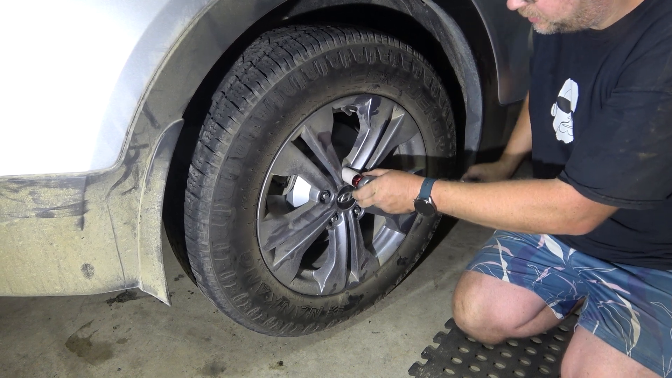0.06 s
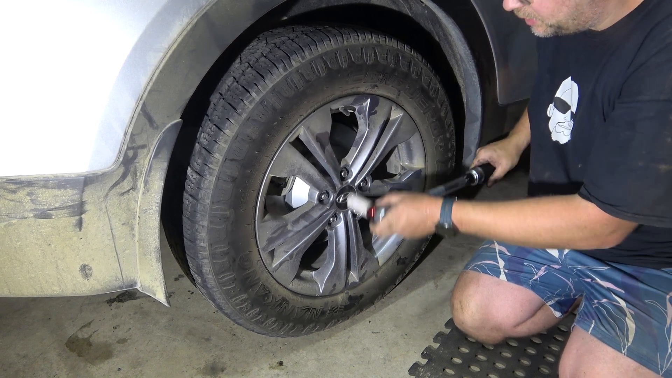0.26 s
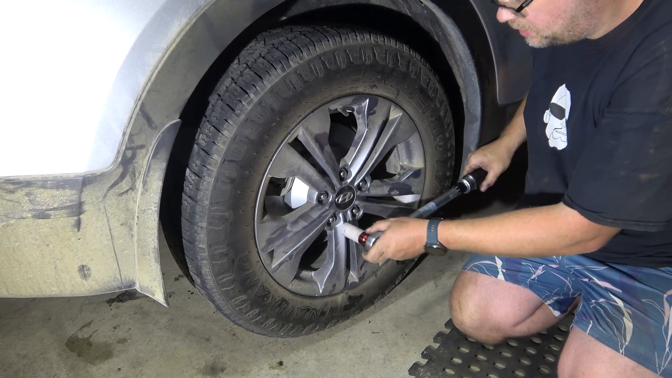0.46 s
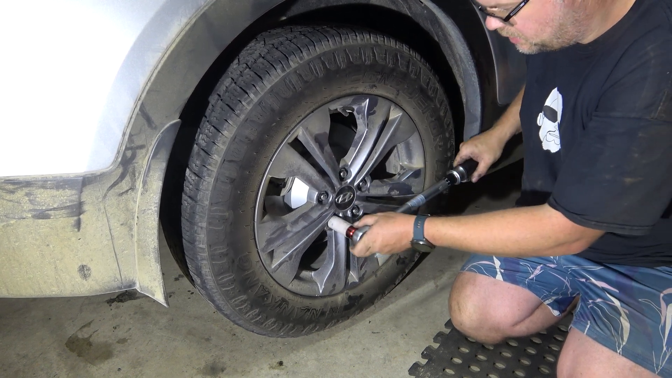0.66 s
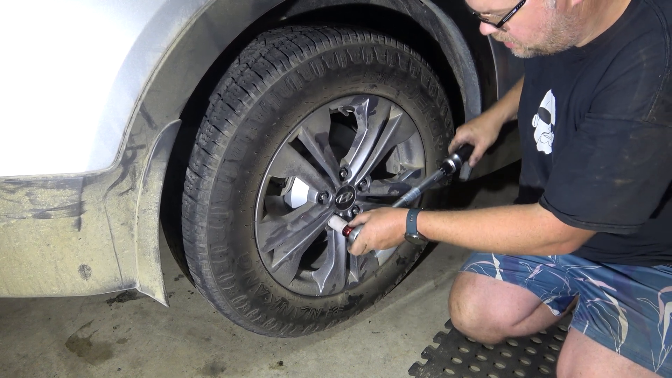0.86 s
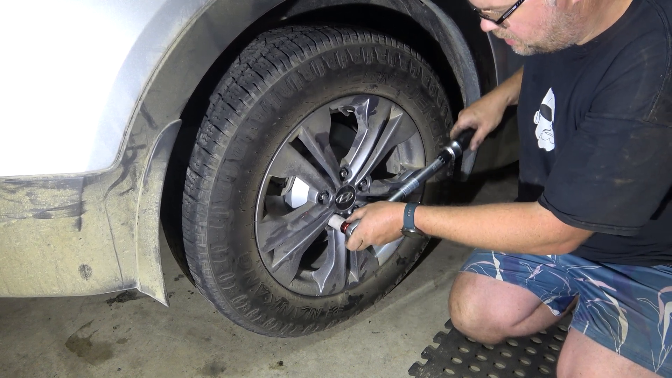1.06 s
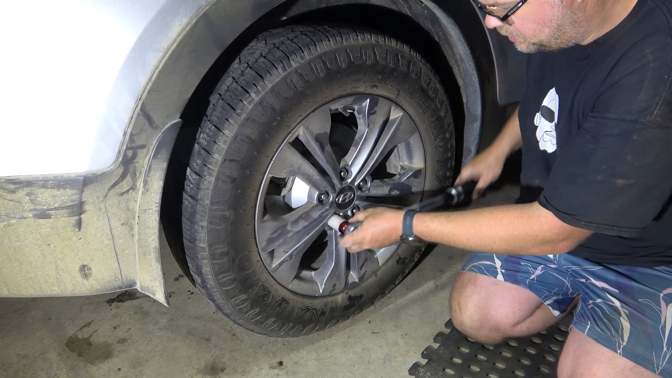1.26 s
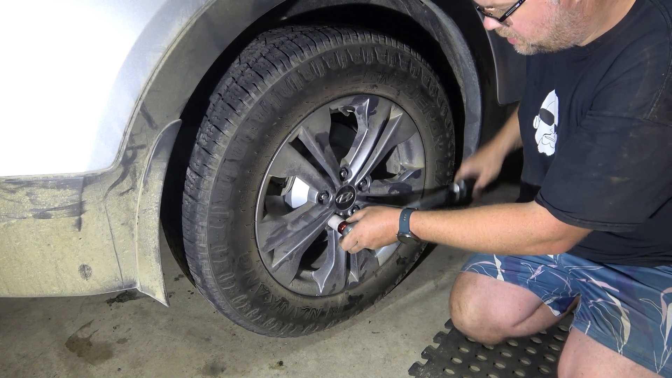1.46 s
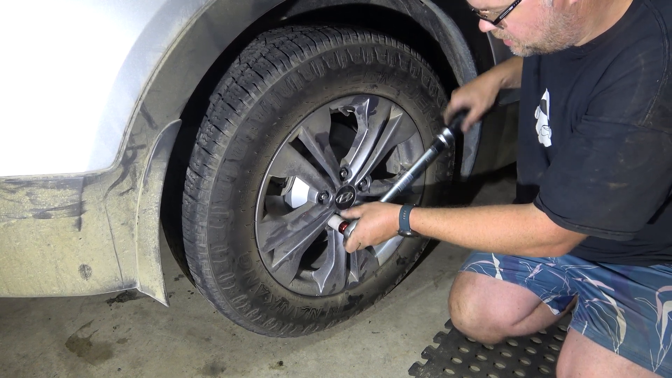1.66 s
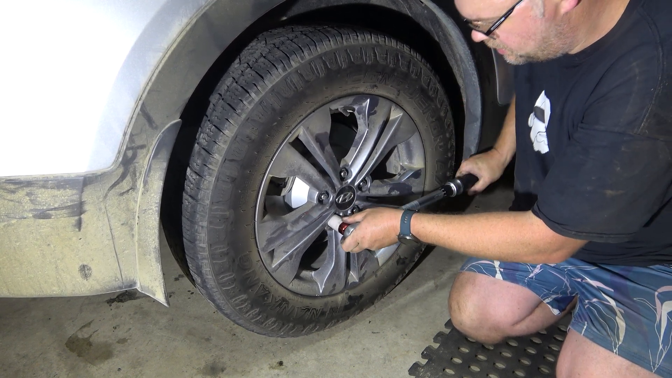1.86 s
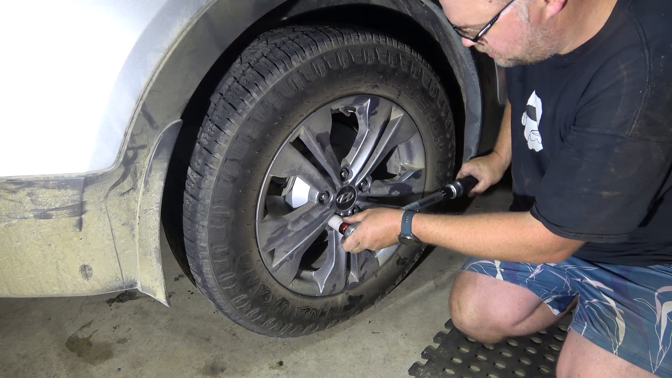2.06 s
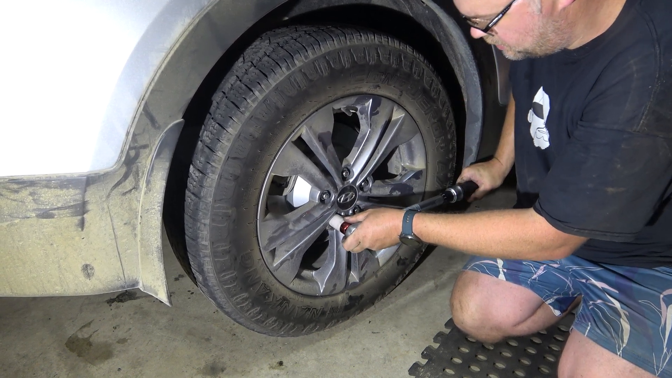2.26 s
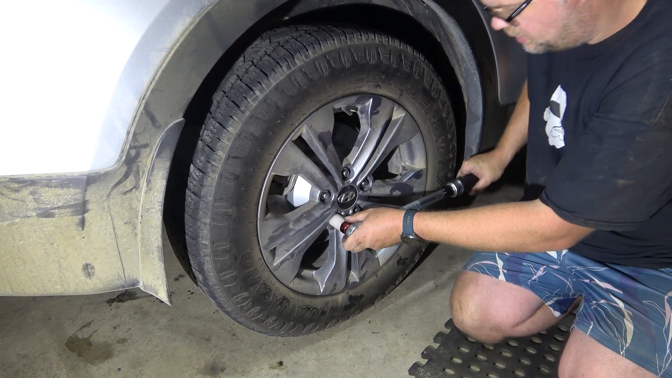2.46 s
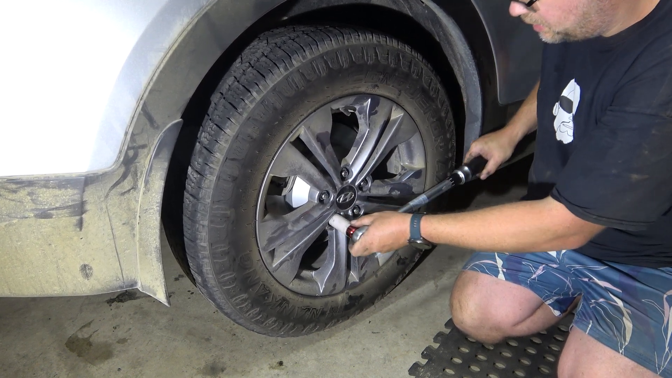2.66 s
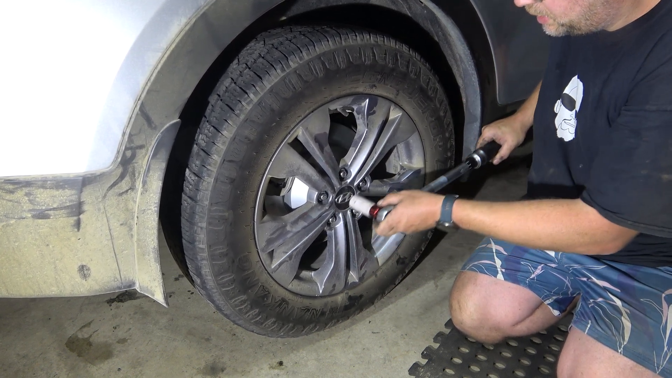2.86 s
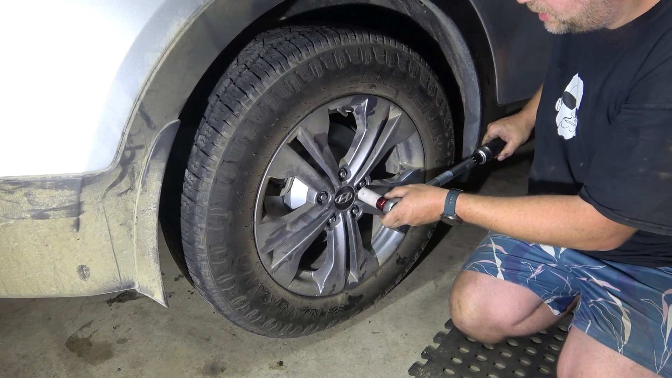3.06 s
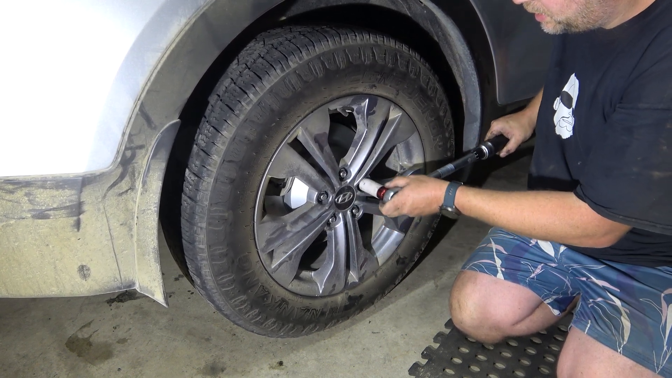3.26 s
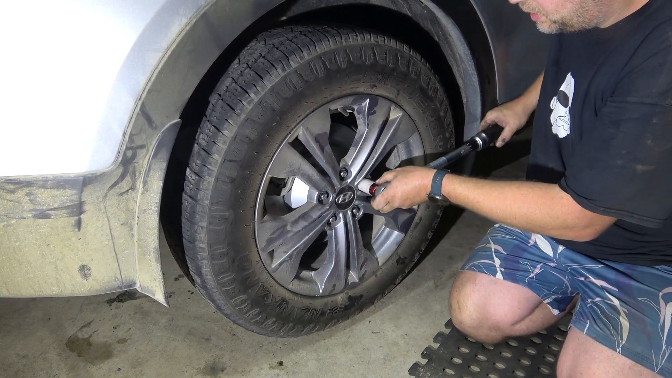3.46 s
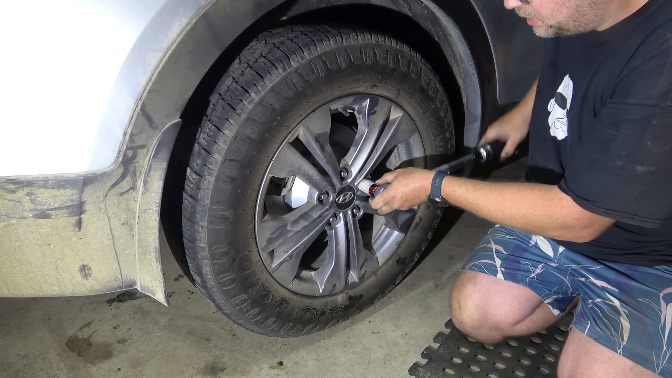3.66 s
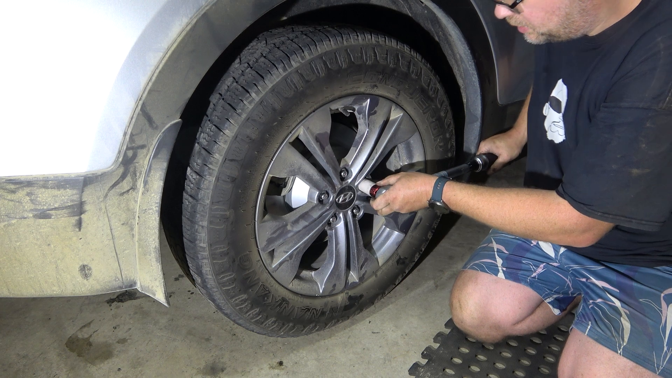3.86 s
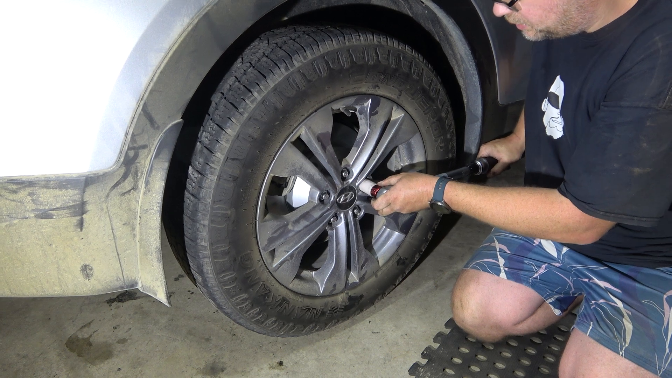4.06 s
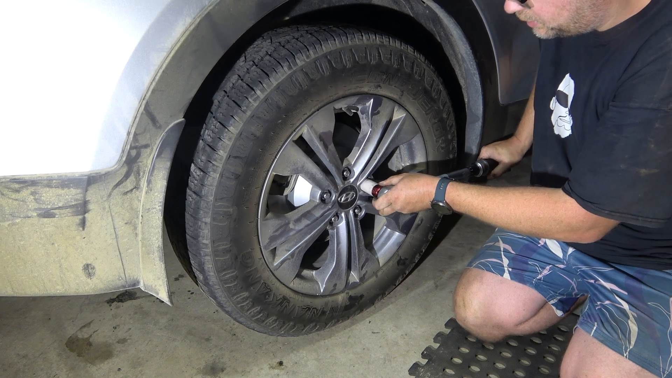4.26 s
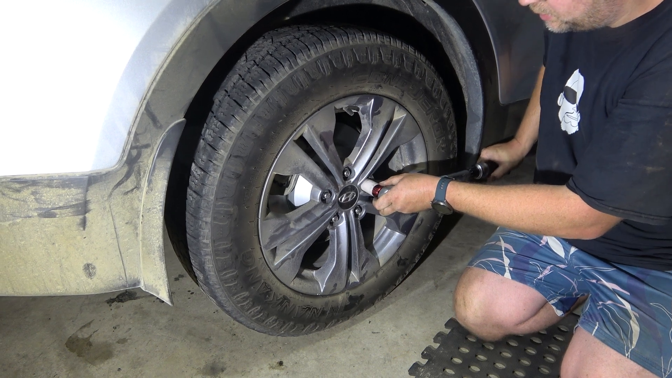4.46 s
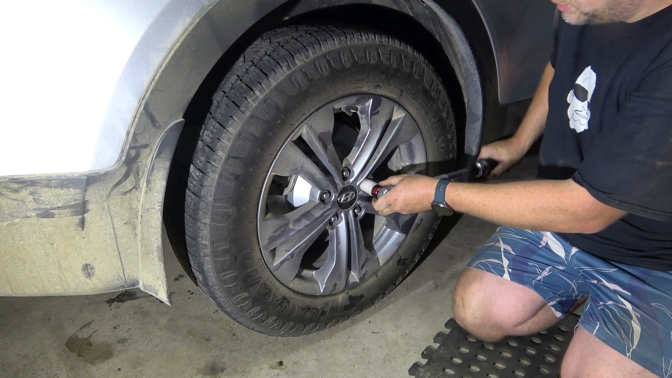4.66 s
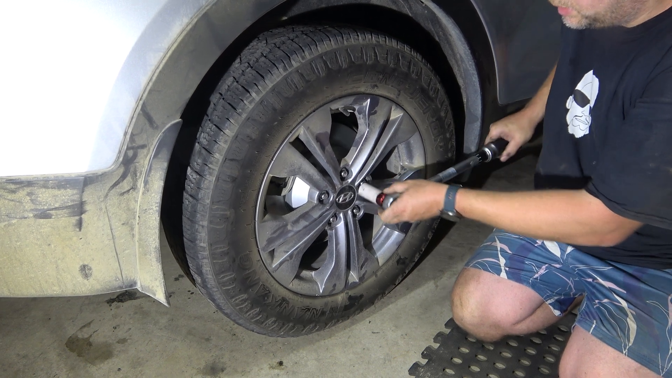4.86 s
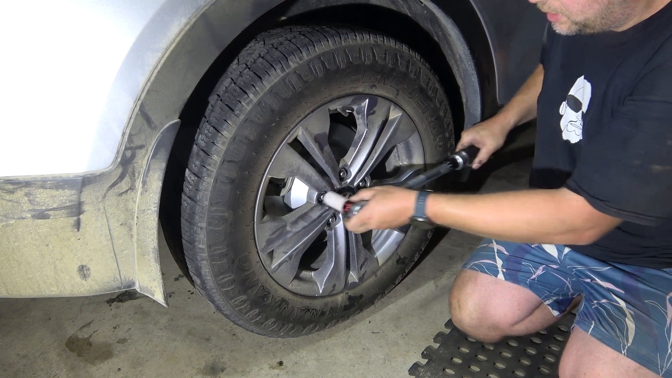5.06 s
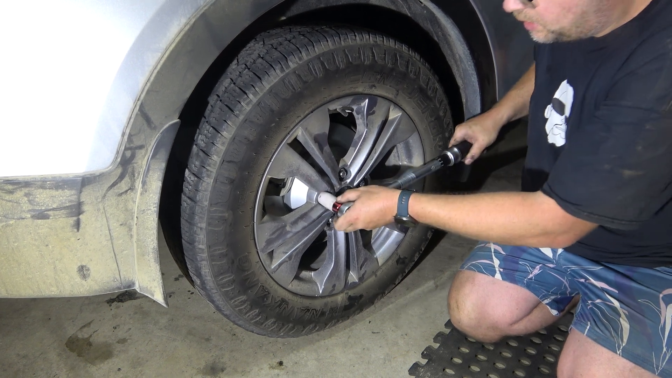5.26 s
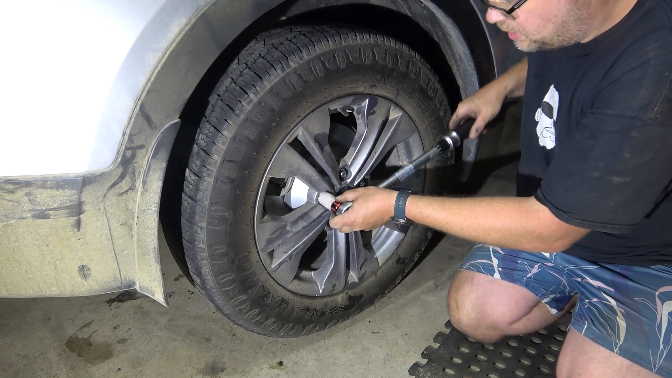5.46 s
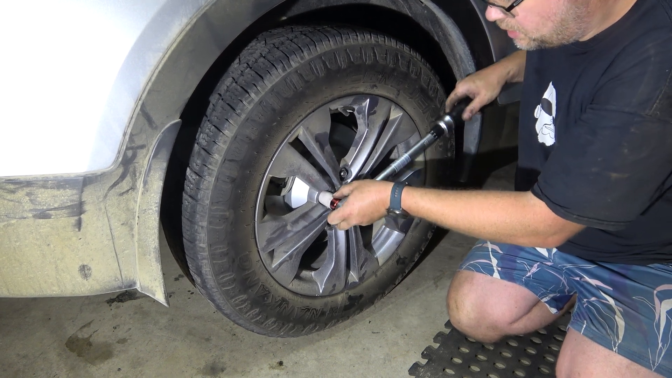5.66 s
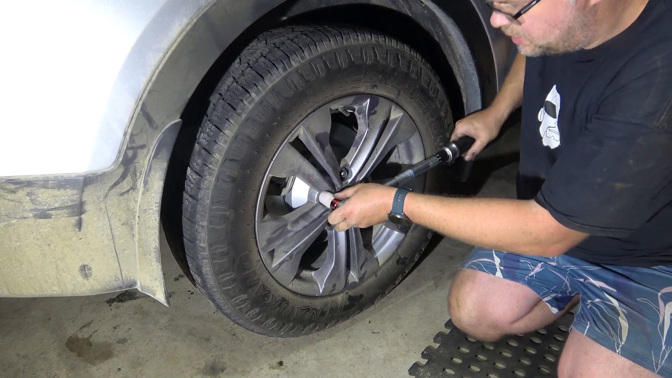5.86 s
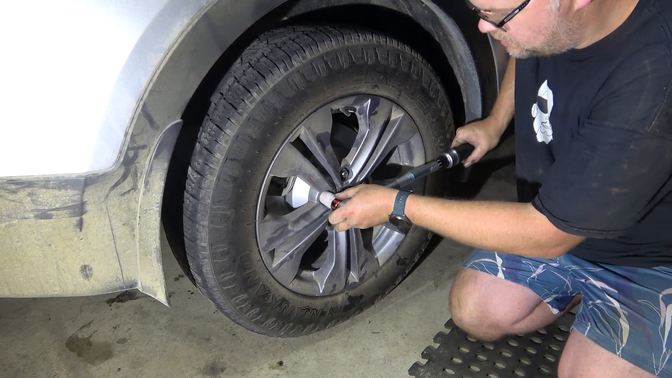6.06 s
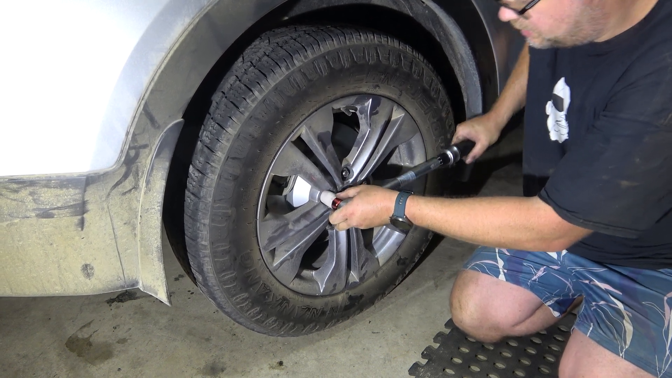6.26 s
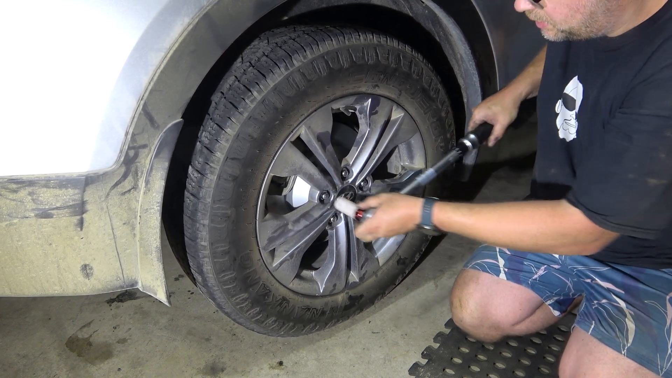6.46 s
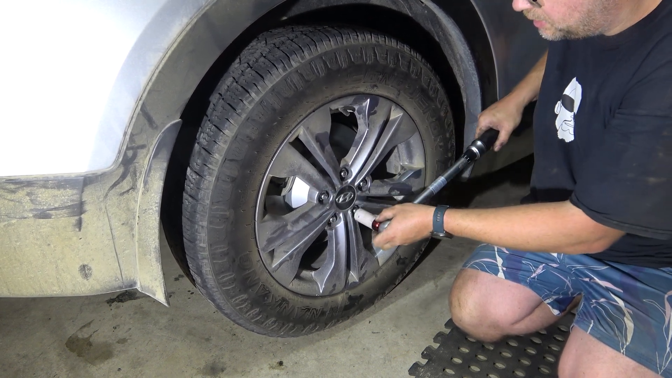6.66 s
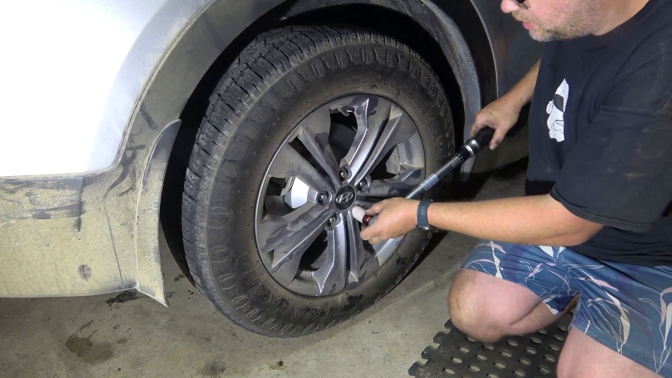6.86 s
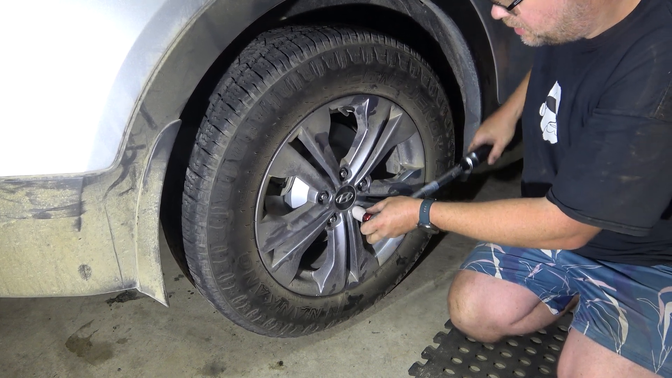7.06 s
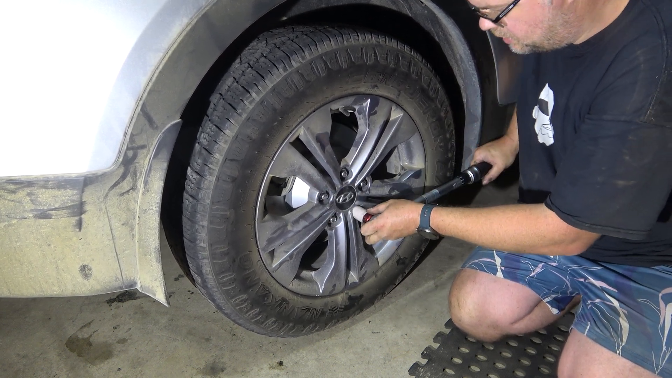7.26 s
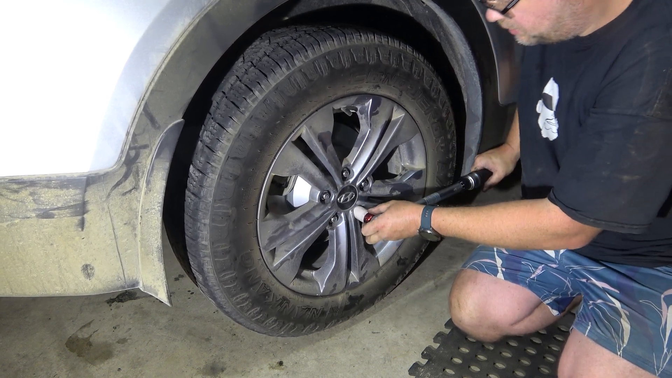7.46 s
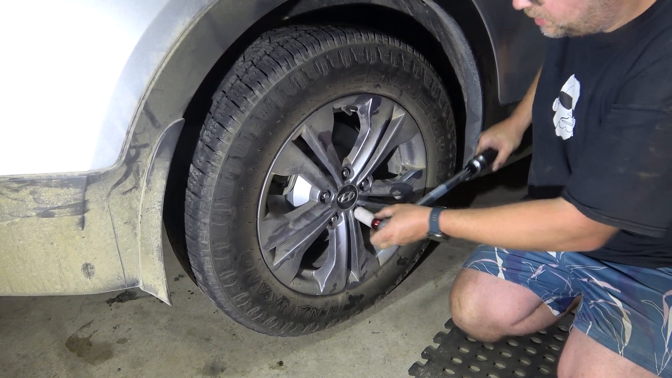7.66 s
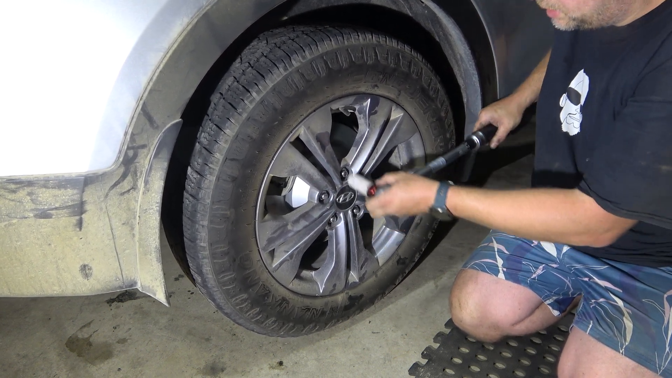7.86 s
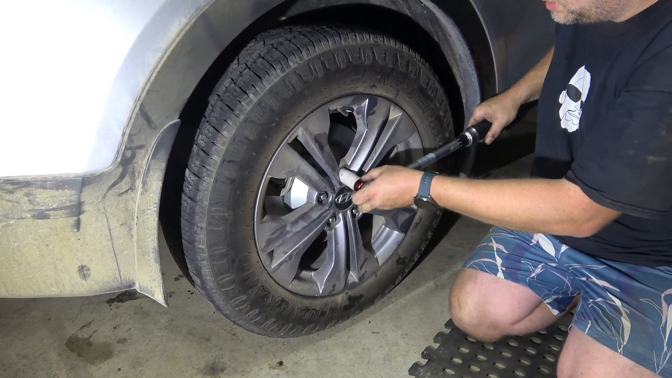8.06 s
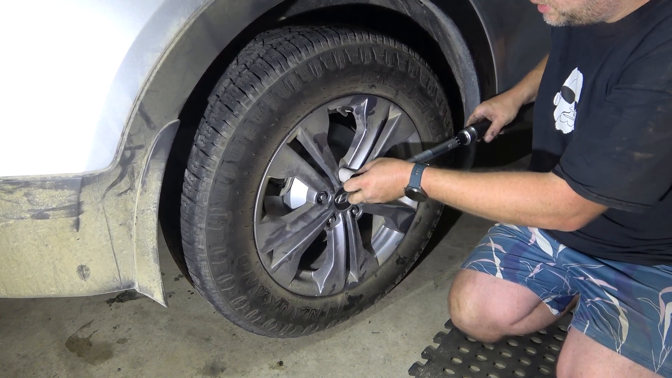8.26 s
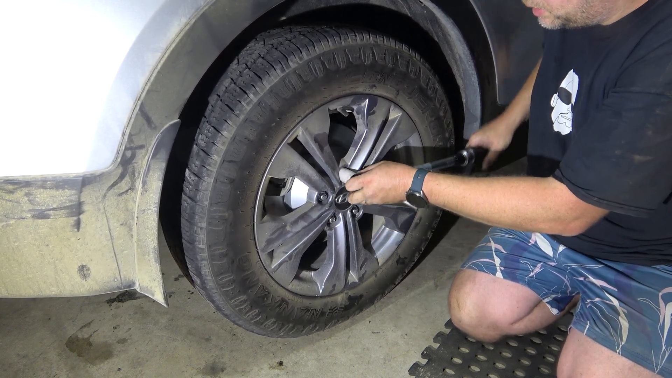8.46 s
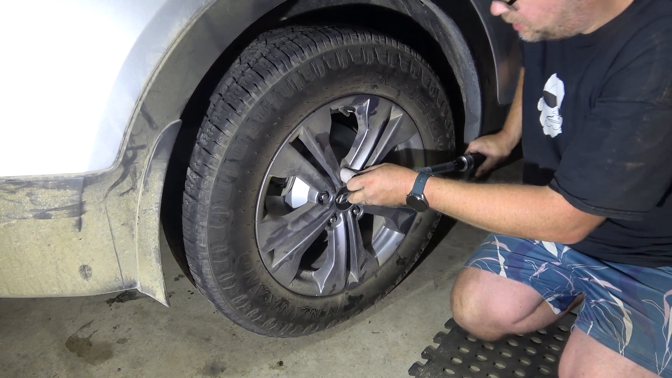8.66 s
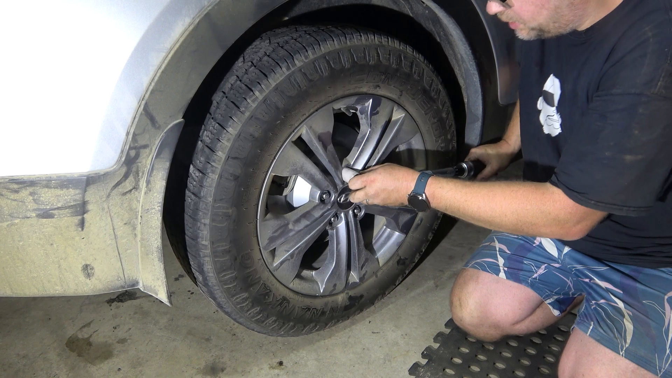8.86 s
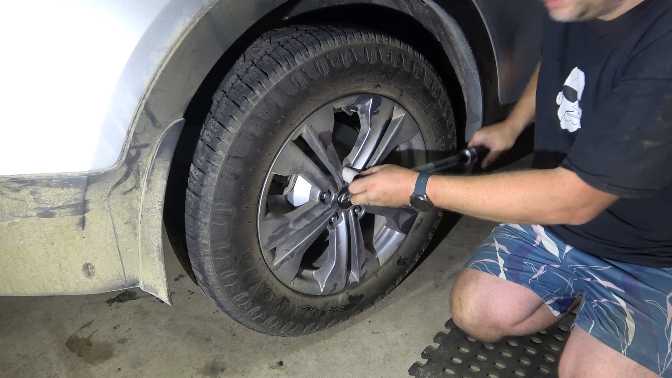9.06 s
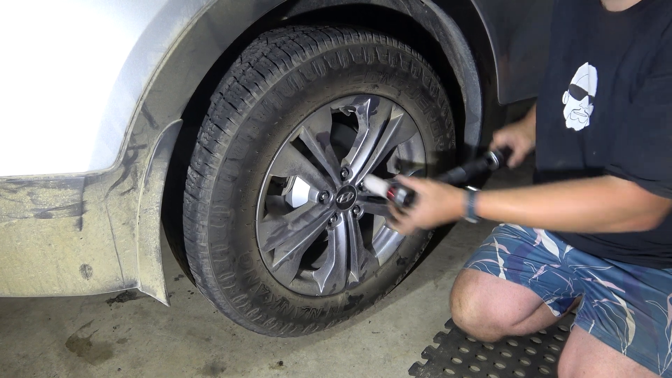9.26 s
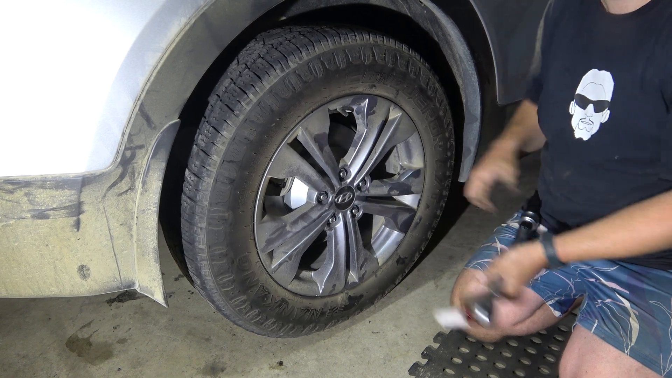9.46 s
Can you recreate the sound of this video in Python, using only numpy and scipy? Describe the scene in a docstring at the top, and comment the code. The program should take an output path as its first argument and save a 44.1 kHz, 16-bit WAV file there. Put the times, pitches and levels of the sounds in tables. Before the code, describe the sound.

Sharp metallic snap-and-click pairs come five times over about ten seconds as wheel nuts are tightened. Between them the socket clatters off one nut and onto the next, with small ratchet ticks, brief scrapes and rattles, and barely audible low tyre thuds. Everything is near and dry at first strike, with a short hard garage tail. Behind it lie a quiet outdoor hush and faint distant birds, including a quick run of rising whistles midway. Close stereo pickup.

```python
"""In a bare garage, close to the wheel, a click-type torque wrench checks five wheel nuts in turn.
The socket knocks, the ratchet ticks, the wrench snaps loudly under load and clicks back as it is eased.
Each blow is a noise burst through steel resonances, with wheel modes and a diffuse garage echo behind it.
Handling scrapes and rattles, the tyre thuds, gliding tones whistle outside; shaped noise is far birds and air.
Two close microphone ports pick it up, and a limiter flattens the loudest snaps."""
import sys
import numpy as np
from scipy import signal
from scipy.fft import rfft, irfft
from scipy.io import wavfile
from scipy.ndimage import uniform_filter1d, minimum_filter1d

SR = 44100
rng = np.random.default_rng(int(sys.argv[2]) if len(sys.argv) > 2 else 0)


def int16_out(signal):
    """Quantize to a 16-bit WAV file."""
    q = np.round(np.clip(np.atleast_2d(signal).T, -1, 1) * 32767)
    wavfile.write(sys.argv[1], SR, q.astype(np.int16))


N = 419832
RING = 32768  # samples in one struck sound or bird note
AGE = np.arange(RING) / SR  # seconds since its onset
FREQS = np.maximum(np.fft.rfftfreq(RING, 1 / SR), 1)

# the wrench breaks over at its set torque: start_s, level_db, ring_hz (strongest), lift_db
SNAPS = [(2.156, -4, 4600, 8.5), (4.454, -4, 8150, 5.5), (6.040, -2.5, 4660, 3), (7.309, -2.5, 8050, 4.5),
         (8.722, -3, 7600, 9)]
# the hinge drops back as the pull is eased: start_s, level_db
RETURNS = [(-.012, -10.5), (2.391, -10.5), (4.642, -11), (6.233, -9), (7.487, -8.5), (8.955, -8.5)]
# the socket meets or leaves a nut: start_s, level_db, bass_db, treble_db, ring_hz, lift_db (of that ring)
KNOCKS = [(.722, -10.5, -5.5, 0, 912, 12.5), (1.212, -25, 3, 5, 6300, 0), (1.224, -14.5, -1, 1, 2300, 2.5),
          (1.233, -24.5, 1.5, 0.5, 6370, 17), (1.507, -22, -13.5, 7.5, 4560, 1.5),
          (3.092, -25.5, 0, 15.5, 1800, 8.5), (3.339, -13, -8, 2, 1580, 8), (3.351, -14, -9, -24, 2150, 9),
          (3.394, -23.5, 11.5, 8.5, 4400, 1), (3.400, -23.5, 8.5, -0.5, 4440, 13),
          (5.127, -28.5, 10, -4.5, 800, 3), (5.203, -14.5, -6.5, -3.5, 2080, 8.5),
          (5.211, -13.5, -4.5, -2.5, 800, 11), (6.779, -11.5, -1.5, 2, 920, 5),
          (6.825, -14.5, 2.5, 2.5, 4940, 5.5), (8.119, -28, -8, -12, 2300, -1),
          (8.134, -27, -2.5, -10, 6230, 11), (8.165, -17, -15, 1, 5860, 10.5),
          (8.210, -20, -13, -7, 2410, 0), (9.373, -28.5, -16, 7, 2286, 13)]
# wrench resonances on the wheel, under load: centre_hz, width_hz, level_db
LOADED = [(105.6, 40, 2.5), (267, 67, 4), (381, 120, 1), (610, 147, 1.5), (1080, 160, -6.5),
          (2120, 350, -1), (2690, 690, -2), (3640, 340, -8), (4430, 820, 2.5), (4960, 280, -8.5),
          (5580, 640, -6), (6550, 510, -2), (8100, 900, -1), (9300, 480, -8), (10400, 440, -9)]
# wrench resonances on the wheel, slack: centre_hz, width_hz, level_db
SLACK = [(97, 103, -9), (280, 36, -2.5), (382, 31, 3.5), (583, 180, -4.5), (1112, 240, -8), (1982, 210, 1),
         (2550, 490, -7), (3420, 640, -6), (3800, 550, -0.5), (4780, 640, -3), (5235, 590, 1.5),
         (6820, 600, -3), (7390, 350, 1), (8950, 550, -0.5), (10370, 290, -6)]
# harder knocks chatter longer: t60 at the usual level, and dB of length per dB of level
CHATTER_T60_S, USUAL_KNOCK_DB, CHATTER_GROWTH = 0.087, -18.5, 0.13


def wrench():
    """Snaps ring the loaded wrench, return clicks the slack one, and knocks the socket."""
    out = np.zeros((2, N))
    loaded, slack, socket = body(LOADED), body(SLACK), socket_gain()
    for start_s, db, hz, lift_db in SNAPS:
        gain = loaded * lift(hz, lift_db, share=0.038)
        add(out, *blow(start_s, db, gain, bass_db=-3, treble_db=3,
                       crack_t60=0.016, room_db=-11, wheel_db=-23))
    for start_s, db in RETURNS:
        add(out, *blow(start_s, db, slack, bass_db=1.5, treble_db=-1.44,
                       crack_t60=0.047, room_db=-7, wheel_db=-22))
    for start_s, db, bass_db, treble_db, hz, lift_db in KNOCKS:
        chatter_t60 = CHATTER_T60_S * undb(CHATTER_GROWTH * (db - USUAL_KNOCK_DB))
        gain = socket * spot(ripple_db=2.0) * lift(hz, lift_db, share=0.075)
        add(out, *blow(start_s, db, gain, bass_db, treble_db, chatter_t60, room_db=-11, wheel_db=-25))
    return out


# the wheel rings on faintly after every blow: mode_hz, level_db, t60_s
WHEEL = [(108.2, -3.5, .42), (232.5, -8.5, 0.42), (312, -2, 0.34), (372.5, -0.5, 0.34), (392.4, -5, .3),
         (558.5, -6, 0.46), (843, -7, 0.2), (1017, -6, 0.18), (1560, -14, 0.47), (2020, -6, .35),
         (2258, -13, 0.6), (4199, -2, .22), (4870, -9, 0.32)]


def blow(start_s, db, gain, bass_db, treble_db, crack_t60, room_db, wheel_db):
    """Steel chatters briefly on steel, rings the parts and the wheel, and fills the garage."""
    tone = undb(along(FREQS, [(350, bass_db), (1200, 0), (3500, 0), (8000, treble_db)]))
    envelope = fade(crack_t60) * (1 - np.exp(-AGE / 0.00032))
    chatter = rfft(rng.standard_normal((2, RING)) * envelope)
    contact = chatter * np.array([[1], [0.6]]) + undb(room_db) * garage()
    mid, side = contact * causal(gain * tone)
    ring = np.zeros(RING)
    for hz, mode_db, t60 in WHEEL:
        phase = rng.uniform(0, 2 * np.pi)
        ring += undb(mode_db) * fade(t60) * np.sin(2 * np.pi * hz * AGE + phase)
    ring *= 1 - np.exp(-AGE / 0.011)  # the ring's onset is rounded over about 11 ms
    mid = mid + undb(wheel_db) * tone * rfft(ring)
    return start_s, undb(db) * irfft(ports(mid, side, FREQS))


# broad resonances of the socket: centre_hz, width_hz, level_db
SOCKET = [(166, 60, -3), (298, 178, 2), (590, 190, -1), (740, 100, -3.5), (1080, 430, -3.5), (1590, 500, 1),
          (2030, 280, 1.5), (2460, 210, 3.5), (2830, 700, 3), (3610, 600, 2.5), (4230, 870, -1.5),
          (4620, 400, 3), (5170, 570, -4), (6400, 1420, -2.5), (7500, 3260, -7), (9650, 1500, -11.5)]
# narrow peaks and dips of the rim and the socket: centre_hz, lift_db (negative cuts)
RIM = [(554, 4.5), (1020, 4.5), (1560, 4.5), (1790, 5), (2050, 3.5), (2280, 10), (2650, 5), (3700, -3),
       (3908, -1), (4190, 9.5), (4510, 0), (4823, -5), (5136, -0.5), (6643, -13), (6950, 5)]


def socket_gain():
    """The socket's broad resonances with narrow peaks and dips of the rim and the socket on top."""
    bands = [lift(hz, db, share=0.0053) for hz, db in RIM]
    return unit(body(SOCKET) * np.prod(bands, axis=0))


def body(resonances):
    """Gain of overlapping resonances with steep skirts, rms 1."""
    power = np.zeros(len(FREQS))
    for hz, width, db in resonances:
        offset = (FREQS - hz) / (0.88 * width)
        power += undb(db) ** 2 / (1 + offset ** 2) ** 2
    return unit(np.sqrt(power))


def lift(hz, db, share):
    """Raise or lower a narrow band whose half-width is a share of its pitch."""
    return undb(db / (1 + ((FREQS - hz) / (share * hz)) ** 2))


def spot(ripple_db=3.0):
    """Each point of contact favours its own mix of the closely packed modes."""
    ripple = rng.standard_normal(len(FREQS))
    for _ in range(2):
        ripple = uniform_filter1d(ripple, size=80)
    return undb(ripple_db * unit(ripple))


# the clearest ticks of the pawl and the loose socket: start_s, level_db (relative), brightness_db
TICKS = [(.884, -26.5, -6.5), (1.094, -32.5, -7.5), (1.581, -25.5, 7.5), (1.68, -28, -2),
         (1.772, -29.5, -6), (1.811, -29, -10.5), (2.609, -21.5, -1), (3.231, -26.5, -14),
         (4.783, -20.5, -4), (5.345, -27, -17.5), (5.503, -26, -9.5), (5.548, -29.5, -5), (5.64, -27, -10),
         (5.757, -22.5, -5), (6.93, -24.5, -6.5), (7.09, -23, -6.5), (7.924, -28.5, -0.5), (7.945, -25, 2),
         (7.973, -23.5, 0), (8.011, -23.5, 3.5), (8.368, -32.5, -9), (8.438, -33, -10), (9.427, -29.5, 3)]
# the hand moves the wrench, the socket scrapes and rattles: start_s, length_s, level_db
MOVES = [(1.559, 0.22, -54.5), (3.176, 0.23, -55.5), (3.58, 0.17, -61), (5.45, .08, -51),
         (5.641, 0.11, -51), (6.695, 0.061, -49.5), (7.924, 0.1535, -47.5), (8.331, 0.31, -60.5),
         (9.333, 0.058, -37)]
RATTLES_PER_S = 13
RATTLE_DB, RATTLE_SCATTER_DB = 19.5, 1  # tick level above that of the move, and its random spread


def handling():
    """Single ticks, and a scrape with any small chance rattles whenever the wrench is moved."""
    out, socket = np.zeros((2, N)), socket_gain()
    for start_s, db, bright_db in TICKS:
        add(out, *tick(start_s, db, bright_db, socket))
    for start_s, length, db in MOVES:
        gain = socket * spot() * lift(1970, 6, share=0.12)
        add(out, start_s, undb(db) * scrape(length, gain))
        for slot in range(int(length * RATTLES_PER_S)):
            when = start_s + (slot + rng.random()) / RATTLES_PER_S
            rattle_db = db + RATTLE_DB + RATTLE_SCATTER_DB * rng.standard_normal()
            add(out, *tick(when, rattle_db, bright_db=-5, socket=socket))
    return out


def tick(start_s, db, bright_db, socket):
    """A light touch of steel; the brighter it is, the less bass it has."""
    gain = socket * spot() * undb(-10.5)  # weakens the contact and echo, not the wheel
    return blow(start_s, db, gain, -bright_db, bright_db, crack_t60=0.061, room_db=-10.5, wheel_db=-32.0)


def scrape(length, gain, grain_db=4, room_db=-22):
    """Dense tiny slips of uneven size ring the socket and the garage."""
    swell = np.sin(np.pi * np.minimum(AGE / length, 1))
    happens = rng.random(RING) < 500 / SR  # about 500 slips per second
    slips = happens * undb(grain_db * rng.exponential(size=RING)) * swell
    mid, side = undb(room_db) * garage()
    sound = irfft(ports(1 + mid, side, FREQS) * rfft(slips) * causal(gain))
    return unit(sound) * np.sqrt(length * SR / RING)  # energy in step with length


# the tyre takes the weight of the wrench with a dull thud: start_s, level_db (relative)
THUDS = [(1.234, -33), (1.831, -45.5), (3.098, -43), (3.405, -35), (3.463, -38), (5.135, -44),
         (8.168, -42.5)]
THUD_HZ, THUD_T60_S = 128.6, 0.46


def thuds():
    """The tyre's low modes swell and die away, alike at both microphone ports."""
    out = np.zeros((2, N))
    ring = np.zeros(RING)
    for ratio, mode_db in ((1, 1.5), (0.51, -7), (1.3, -4)):
        ring += undb(mode_db) * np.sin(2 * np.pi * THUD_HZ * ratio * AGE)
    ring *= fade(THUD_T60_S) * (1 - np.exp(-AGE / 0.0033))
    for start_s, db in THUDS:
        add(out, start_s, np.tile(undb(db) * ring, (2, 1)))
    return out


# garage decay: band_hz, t60_s
GARAGE = [(100, 0.75), (300, 0.41), (1000, 0.4), (2500, 0.4), (5000, 0.37), (8000, 0.36), (11000, 0.31)]


def garage():
    """Spectra (mid, side) of the diffuse echo from one spot, each band dying at its own rate."""
    noise = rfft(rng.standard_normal((2, RING)))
    centres = np.array(GARAGE)[:, 0]
    tail = np.zeros((2, RING))
    for share, (_, t60) in zip(np.eye(len(GARAGE)), GARAGE):
        band = along(FREQS, np.c_[centres, share])  # 1 at its own centre, 0 at the others
        tail += irfft(noise * band) * fade(t60)
    return rfft(tail * (1 - np.exp(-AGE / 0.0041)))


# lone upward sweeps, most cut short: start_s, share (of the full length), level_db
SWEEPS = [(1.895, 0.51, -59), (2, 0.82, -51), (2.105, .45, -54), (2.695, 0.65, -52), (5.45, 1, -50),
          (8.343, 0.92, -47.5)]
SWEEP_S, SWEEP_FROM_HZ, SWEEP_TO_HZ = 0.05, 2900, 5430
# the same sweep repeated in one even run
RUN_START_S, RUN_PERIOD_S, RUN_DB = 5.64, 0.091, -41.5
# short rising chips in two voices: start_s, top_hz (upper voice), level_db
CHIPS = [(2.054, 7000, -51), (2.751, 6070, -44), (3.568, 6220, -50.5), (3.63, 6520, -50),
         (3.733, 6750, -49.5), (5.503, 6940, -45.5), (8.568, 7100, -49.5)]
CHIP_S, CHIP_RISE, LOW_VOICE_RATIO, LOW_VOICE_DB = 0.0312, 0.15, 0.77, -4.5
# clear falling slurs that settle on one pitch: start_s, length_s, pitch_hz (start), level_db
SLURS = [(2.802, .2, 4650, -45), (3.761, .125, 7100, -45)]
SLUR_END_HZ, SLUR_SETTLING = 3680, 5.5  # settling: time constants within a slur
# hoarse gliding calls, short and long, most of them faint:
# start_s, length_s, pitch_hz (start), pitch_hz (end), level_db
CALLS = [(1.846, 0.14, 3930, 3900, -57), (2.735, .057, 6000, 5750, -51), (7.2, .16, 2680, 2850, -56),
         (7.69, 0.3, 3090, 2835, -55), (7.921, 0.16, 2407, 2387, -44.5), (8.561, 0.203, 2385, 2486, -52),
         (8.61, 0.048, 5520, 5450, -49.5), (9.185, 0.15, 2200, 2335, -53)]


def birds(count=5):
    """Sweeps, alone and in a run of count notes, two-voiced chips, falling slurs and hoarse calls."""
    out = np.zeros((2, N))
    run = [(RUN_START_S + k * RUN_PERIOD_S, 1, RUN_DB) for k in range(count)]
    sweep = glide(SWEEP_S, SWEEP_FROM_HZ, SWEEP_TO_HZ)
    for start_s, share, db in SWEEPS + run:
        add(out, start_s, undb(db) * whistle(share * SWEEP_S, sweep, hoarse=0.016, echo_db=-3))
    for start_s, top_hz, db in CHIPS:
        hz = glide(CHIP_S, top_hz * (1 - CHIP_RISE), top_hz)
        for ratio, voice_db in ((1, 0), (LOW_VOICE_RATIO, LOW_VOICE_DB)):
            note = whistle(CHIP_S, ratio * hz, hoarse=0.008, echo_db=-4)
            add(out, start_s, undb(db + voice_db) * note)
    for start_s, length, start_hz, db in SLURS:
        hz = SLUR_END_HZ + (start_hz - SLUR_END_HZ) * np.exp(-SLUR_SETTLING * AGE / length)
        add(out, start_s, undb(db) * whistle(length, hz, hoarse=0.007, echo_db=-4))
    for start_s, length, start_hz, end_hz, db in CALLS:
        hz = glide(length, start_hz, end_hz)
        add(out, start_s, undb(db) * whistle(length, hz, hoarse=0.037, echo_db=3.5))
    return out


def glide(length, start_hz, end_hz):
    """Pitch that moves evenly through a note."""
    return np.interp(AGE, [0, length], [start_hz, end_hz])


def whistle(length, hz, hoarse, echo_db):
    """One note on a randomly wobbling pitch curve, with the garage's echo behind it."""
    wobble = 1 + hoarse * unit(uniform_filter1d(rng.standard_normal(RING), size=60))
    swell = np.sin(np.pi * np.minimum(AGE / length, 1))
    note = swell * np.sin(2 * np.pi * np.cumsum(hz * wobble) / SR)
    echo = garage()
    mid, side = undb(echo_db) * echo / echo.std()
    return irfft(rfft(note) * ports(1 + mid, side, FREQS))


# level of the far-off bird chorus: time_s, level_db
CHORUS = [(0, -61), (.55, -62.5), (1.05, -60), (2, -65.5), (3, -71), (3.7, -72), (4.5, -71), (7, -59.5),
          (8.5, -59), (9.5, -60)]


def chorus():
    """Distant birds blurred into one band of noise that rises and falls."""
    band = air([(2500, -21.0), (3400, -5.5), (4100, -6.0), (4900, -5.5), (6200, -40)])
    return band * undb(np.interp(np.arange(N) / SR, *np.transpose(CHORUS)))


# spectrum of still air and distant outdoor hush: pitch_hz, level_db (per Hz, relative)
HUSH = [(25, 2.5), (50, -7), (76, 10.5), (110, -14.5), (166, -1), (240, -7), (450, -8), (720, -7),
        (1170, -5.5), (1600, -15), (2700, -20.5), (4300, -25), (6000, -21), (11000, -28)]
HUSH_DB, DRIFT_DB, DRIFT_PER_S = -55.5, 0.35, 1.29  # level, random drift and its steps per second


def hush():
    """Quiet outdoor air, noise whose level drifts a little."""
    steps = rng.standard_normal(size=64)
    drift = np.interp(np.arange(N) / SR * DRIFT_PER_S, np.arange(len(steps)), steps)
    return air(HUSH) * undb(HUSH_DB + DRIFT_DB * drift)


def air(spectrum):
    """Steady stereo noise with this spectrum, rms 1."""
    hz = np.fft.rfftfreq(N, 1 / SR)
    mid, side = rfft(rng.standard_normal((2, N))) * undb(along(hz, spectrum))
    return unit(irfft(ports(mid, side, hz), N))


def ports(mid, side, hz):
    """Two close microphone ports: alike in the bass, apart in the treble."""
    side_db = [(30, -32.0), (100, -12.0), (1000, -13.5), (2500, -17.0), (5000, -14), (8500, -5.5)]
    lean_db = [(500, 0.078), (1200, 0.6), (2500, 1.56), (7000, 0.25)]  # towards the first port
    side = side * undb(along(hz, side_db))
    lean = undb(along(hz, lean_db))
    return np.array([(mid + side) * lean, (mid - side) / lean])


def undb(db):
    """Decibels to gain."""
    return 10 ** (np.asarray(db) / 20)


def unit(x):
    """Scale to rms 1."""
    return x / np.sqrt(np.mean(x ** 2))


def along(hz, points):
    """Read (Hz, value) points on a log-frequency axis."""
    f, value = np.transpose(points)
    return np.interp(np.log(np.maximum(hz, 1)), np.log(f), value)


def fade(t60):
    """Exponential decay by 60 dB in t60 seconds."""
    return np.exp(-np.log(1000) * AGE / t60)


def causal(gain):
    """Minimum-phase response with this gain: sharp attack, then ring."""
    cepstrum = irfft(np.log(gain + 1e-6))
    cepstrum[1:RING // 2] *= 2  # fold the time before the attack onto the time after it
    cepstrum[RING // 2 + 1:] = 0
    return np.exp(rfft(cepstrum))


def add(out, start_s, x):
    """Mix a stereo sound in at start_s, trimmed to the scene."""
    start = int(start_s * SR)
    a, b = max(start, 0), min(start + x.shape[1], N)
    out[:, a:b] += x[:, a - start:b - start]


def scene():
    """The wrench and its handling, the tyre, the birds and the air."""
    return wrench() + handling() + thuds() + birds() + chorus() + hush()


TOP_HZ = 11100  # upper edge of the sound


def record(dry, ceiling_db=-7, recovery_db_per_s=240):
    """A limiter ducks quickly around each peak and recovers steadily; the top is cut."""
    level_db = 20 * np.log10(np.abs(dry).max(axis=0) + 1e-9)
    over = np.maximum(level_db - ceiling_db, 0)
    ramp = recovery_db_per_s * np.arange(N) / SR
    duck = np.maximum.accumulate(over + ramp) - ramp  # jumps up, slides back
    gain_db = uniform_filter1d(minimum_filter1d(-duck, size=45), size=45)  # rounds it over about 1 ms
    low_pass = signal.ellip(10, 0.2, 70, TOP_HZ, fs=SR, output="sos")
    return signal.sosfilt(low_pass, dry * undb(gain_db))


dry = scene()
out = record(dry)
int16_out(out)
```